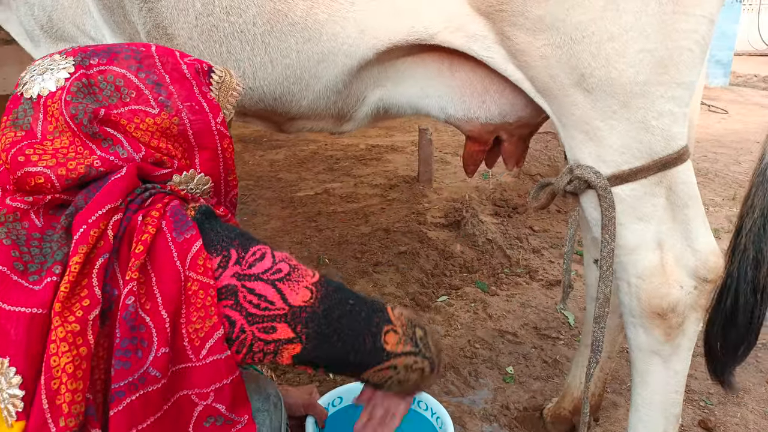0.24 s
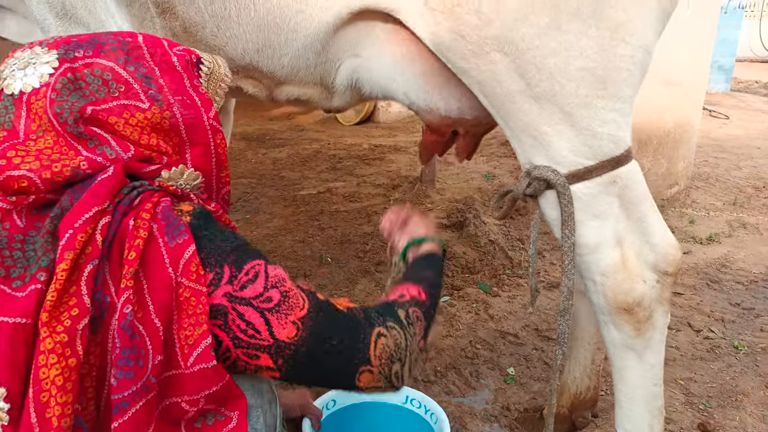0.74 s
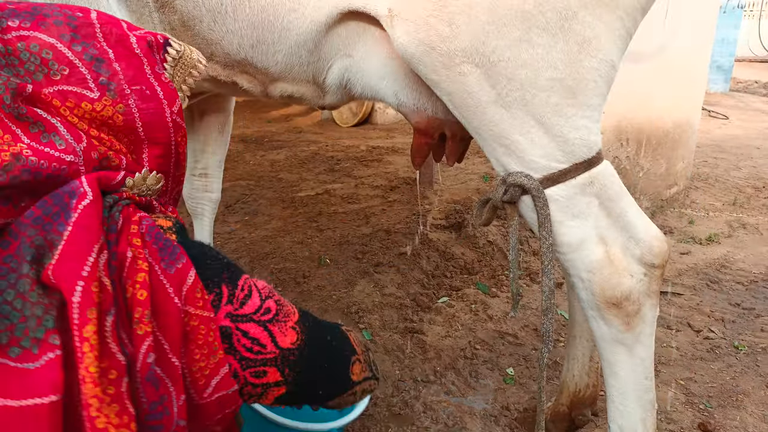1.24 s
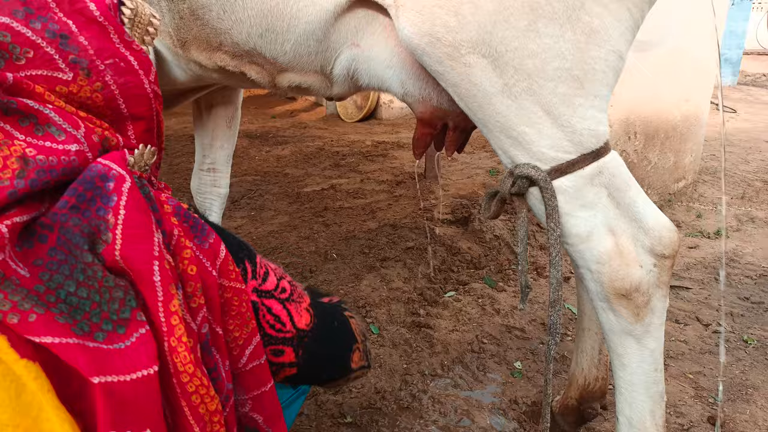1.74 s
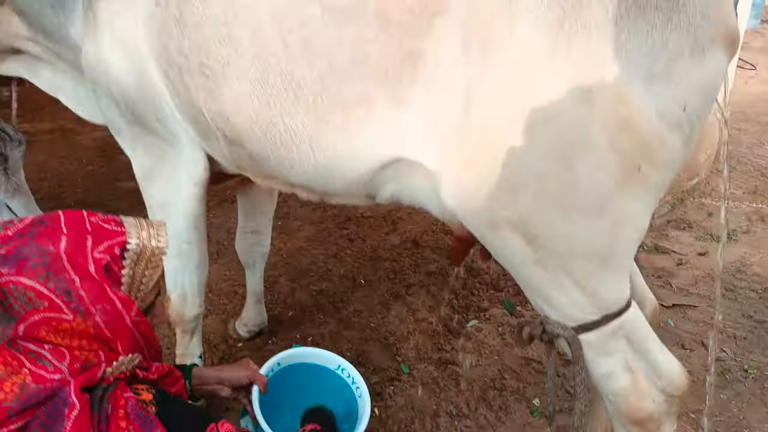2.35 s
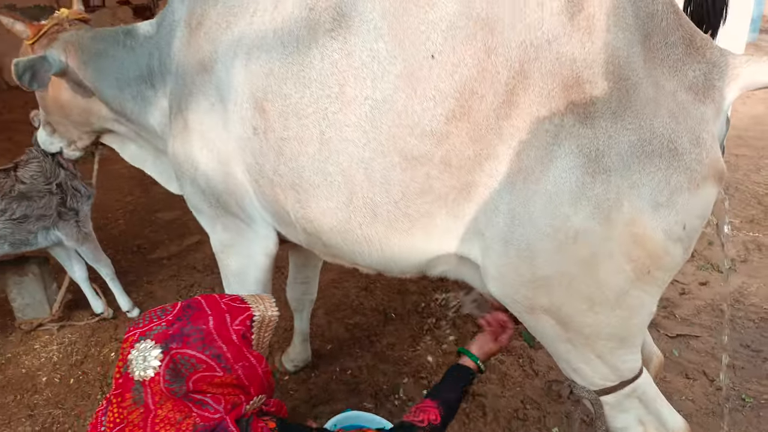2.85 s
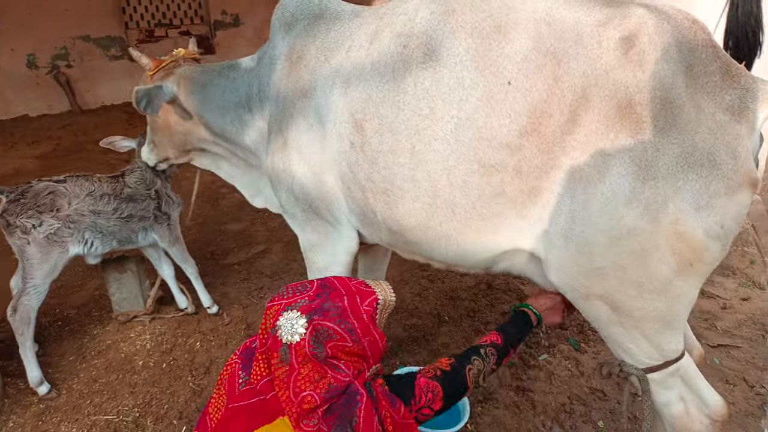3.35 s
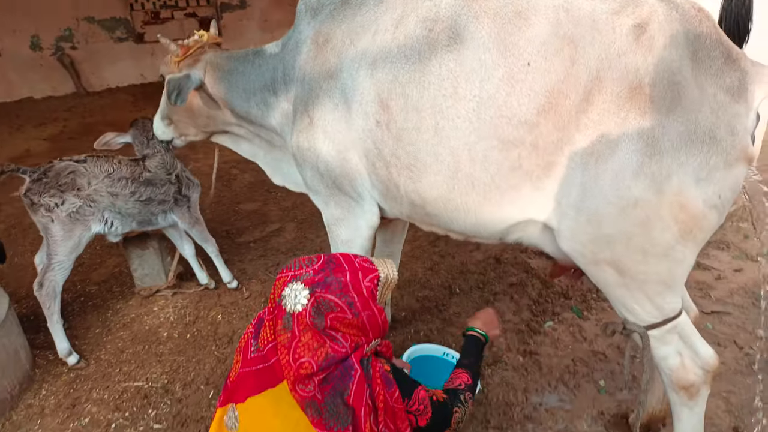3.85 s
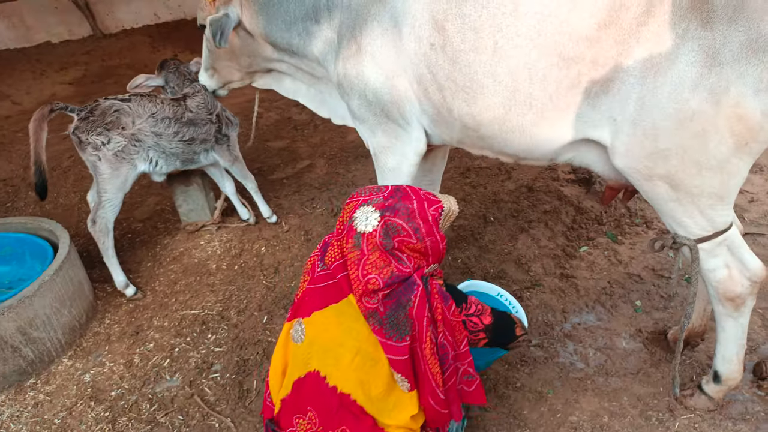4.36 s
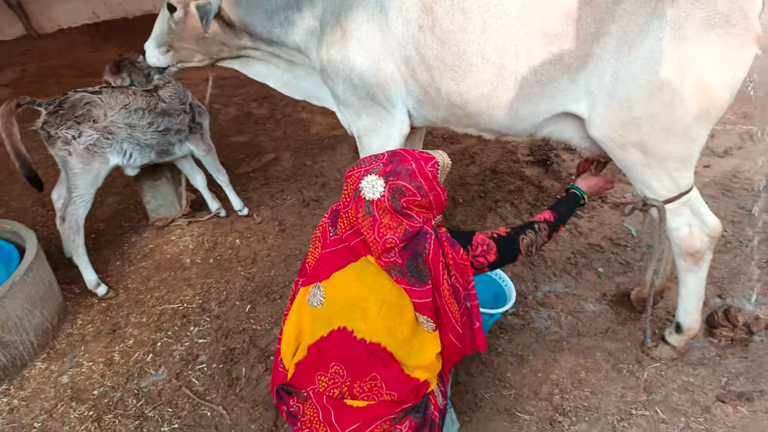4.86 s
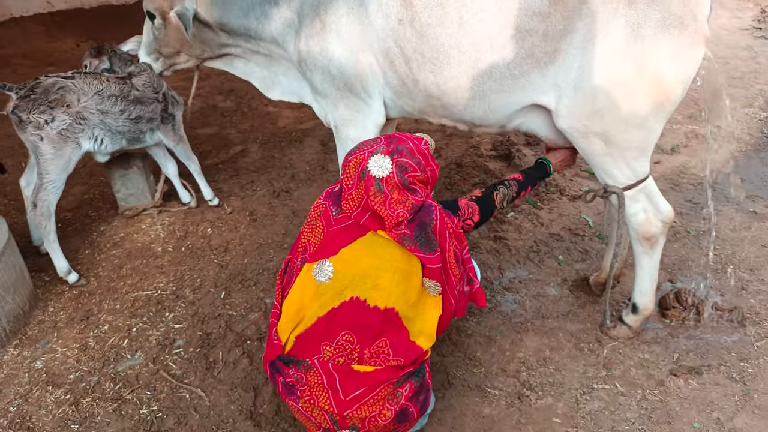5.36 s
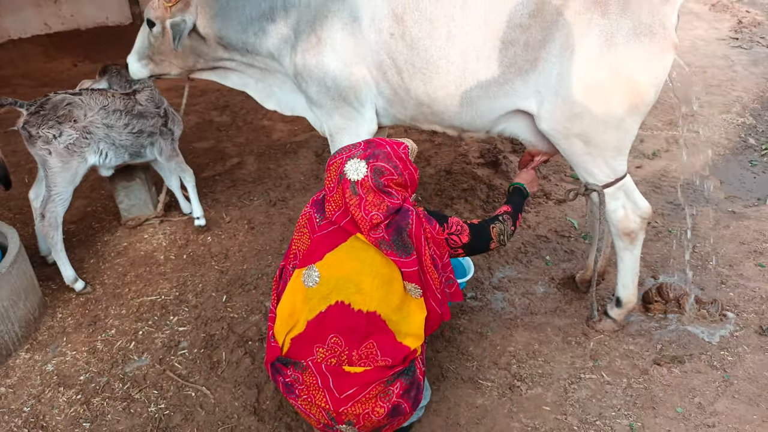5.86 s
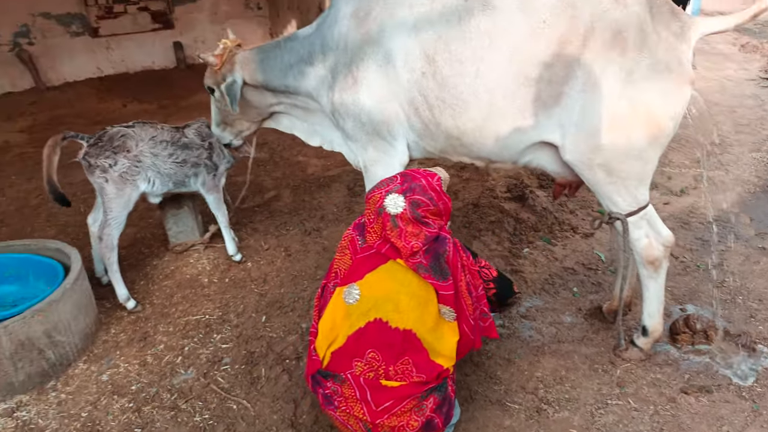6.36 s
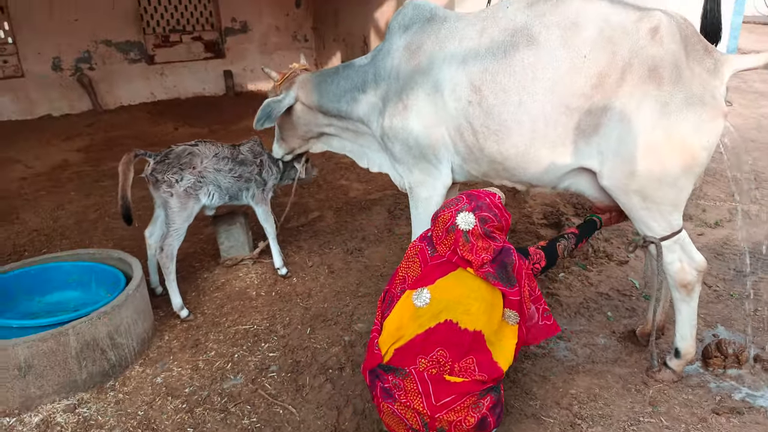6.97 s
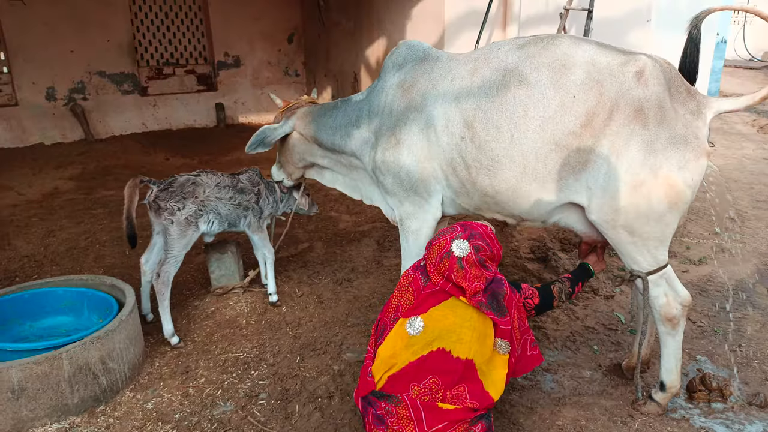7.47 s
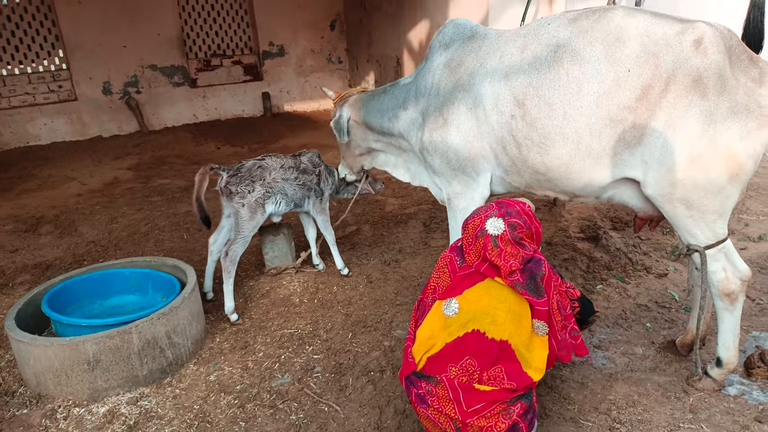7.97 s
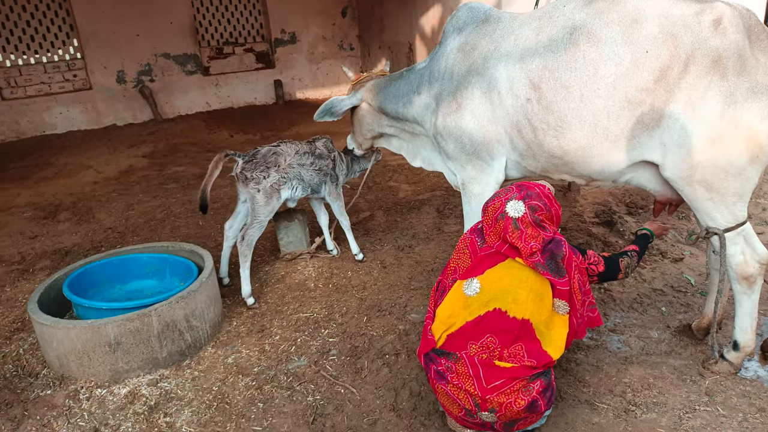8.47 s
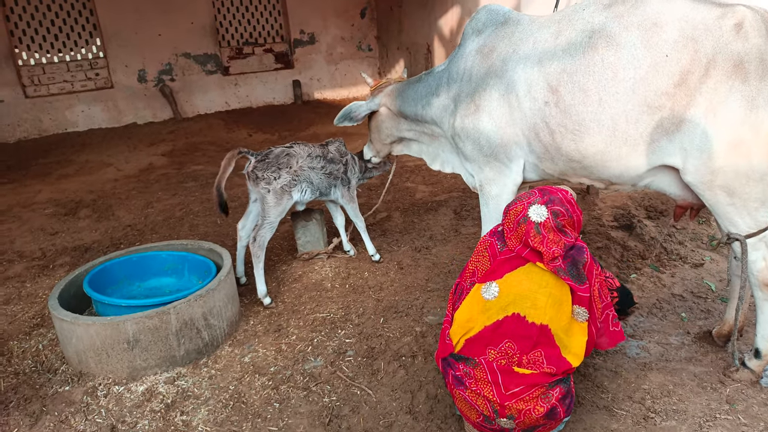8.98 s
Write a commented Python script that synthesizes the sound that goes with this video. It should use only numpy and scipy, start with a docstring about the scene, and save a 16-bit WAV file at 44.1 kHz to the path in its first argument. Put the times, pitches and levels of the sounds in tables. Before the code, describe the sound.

Beside a shed, a hand dips into a plastic bucket with bubbly plops and short sloshes, then throws water over a cow's udder. Splashes and thin trickles spatter on wet earth, growing steadier. The hand-held microphone starts close and backs away, picking up finger knocks, rubbing and soft low wind buffets. There is faint short echo from the walls.

```python
"""A farmyard by a shed: a cow's udder is washed before milking, water scooped by hand from a plastic bucket.
Splashes, drops and a thin stream spattering on wet earth are showers of noise puffs and tiny bubbles.
The water gives chirping sine bubbles, bubble clouds over a soft wash, and short gliding narrow-band rings.
Low noise buffets the hand-held microphone, mostly from wind; fingers bump its case as damped sines and
rub it as shaped noise. The shed walls answer the water with short noise tails, over a quiet bed of air."""
import sys
import numpy as np
from scipy import signal
from scipy.fft import rfft, irfft, next_fast_len
from scipy.io import wavfile
from scipy.ndimage import uniform_filter1d, map_coordinates

SR = 44100
rng = np.random.default_rng(int(sys.argv[2]) if len(sys.argv) > 2 else 0)


def file_out(sig):
    """Save sig as 16-bit WAV at sys.argv[1]."""
    # one column per channel
    cols = np.atleast_2d(sig).T
    # limit, then scale
    lim = np.clip(cols, -1, 1)
    pcm = np.round(lim * 32767).astype(np.int16)
    wavfile.write(sys.argv[1], SR, pcm)


N = 406602  # length in samples

# Still yard air. Each row: frequency in Hz, level in dB.
AIR_COLOUR = [(25, 2), (110, 4.5), (300, 0), (600, -8), (2000, -18.5), (15000, -41.5)]

# Low buffets on the microphone: mostly wind gusts, a few from handling. Each row: start in seconds,
# length in seconds, level in dB before the flutter, left over right in dB.
BUFFETS = [(2.109, 0.06, -41, 3), (2.18, 0.18, -49.5, 3), (2.414, 0.046, -47, -25), (2.556, 0.1, -52.5, 5),
           (3.204, 0.12, -48, 2), (3.365, 0.045, -61, -16), (3.709, 0.033, -52, 5),
           (3.762, 0.041, -47.5, -16), (4.483, 0.18, -55, -13), (4.747, 0.12, -36, 17),
           (4.863, .18, -42.5, 18), (5.366, 0.07, -50.5, -18), (5.534, 0.12, -57, -6),
           (6.536, 0.14, -46.5, -7), (7.394, 0.062, -47, 3), (8.334, 0.069, -63, 16),
           (8.558, 0.067, -55, 27), (9.1, 0.055, -66, -8)]
# Colour of the buffeting. Each row: frequency in Hz, level in dB.
BUFFET_COLOUR = [(20, -24.5), (40, -5.5), (65, 8.5), (110, 6.5), (160, -6), (210, -17.5), (300, -32.5),
                 (600, -43)]
BUFFET_RISE_S, BUFFET_T60_S = 0.047, 0.15
FLUTTER_DB, FLUTTERS_PER_S = 3.5, 17  # depth and pace of the flutter inside a buffet

# Fingers bumping the case. Each row: start in seconds, knock level in dB, pitch in Hz, creak level in dB.
BUMPS = [(3.099, -29.5, 440, -32), (3.163, -27.5, 447, -52), (3.196, -23.5, 444, -38),
         (3.232, -17.5, 410, -36), (3.246, -23, 300, -32), (3.26, -29, 265, -46), (4.078, -30.5, 297, -54),
         (4.107, -26, 330, -50), (4.115, -18.5, 273, -43), (4.148, -21, 272, -42), (4.175, -36, 284, -60),
         (6.545, -29.5, 308, -55), (6.623, -30, 306, -81), (7.4278, -18.5, 240, -27),
         (7.4333, -12, 308, -27), (7.4453, -23.5, 248, -25)]
# Colour of the case's creak. Each row: frequency in Hz, level in dB.
CREAK_COLOUR = [(500, -10.5), (800, -5.5), (1100, -4.5), (1420, 11.5), (1750, 0.5), (2100, -3),
                (3000, -14.5), (5000, -46)]
# Fingers sliding on the case. Each row: start in seconds, rise in seconds, length in seconds, level in dB.
SLIDES = [(3.079, 0.023, 0.07, -50), (3.131, 0.13, 0.14, -34), (3.276, 0.023, 0.03, -42),
          (6.547, 0.017, 0.072, -52.5), (7.423, 0.009, 0.015, -27)]
# Colour of the rubbing. Each row: frequency in Hz, level in dB.
RUB_COLOUR = [(40, -33), (90, -6), (300, -1.5), (470, -7), (620, -23.5), (1000, -52), (1420, -26),
              (1900, -53), (4000, -40)]
# The case singing under a sliding finger. Each row: pitch in Hz, width in Hz, level in dB against the rub.
CASE_TONES = [(469, 48, -11.5), (1436, 84, -15)]
SLIDE_T60_S = 0.089

# Murky ring left by the hardest bumps. Each row: start in seconds, level in dB, t60 in seconds, pitch in Hz,
# sag in octaves a second, low hum level in dB.
AFTERRINGS = [(4.109, -56.5, 0.9, 2107, .7, -55), (7.432, -39.5, 0.96, 2124, .35, -39)]
# Colour of the ring's rasping skirt. Each row: frequency in Hz, level in dB.
SKIRT_COLOUR = [(150, -31), (350, -23.5), (520, -28), (1000, -20), (1400, -10.5), (1750, 3), (2100, -4),
                (2400, -15), (3200, -14.5), (6000, -25.5)]
RING_WIDTH_HZ, SKIRT_DB = 140, -0.5  # the skirt is set against the ring
HUM_HZ, HUM_WIDTH_HZ, HUM_CLIMB_OCTAVES_PER_S, HUM_T60_S = 284, 53, 1, 0.39

# Short narrow-band rings: the bucket's hollow answering the hand, and bright tails of splashes.
# Each row: start in seconds, level in dB, pitch in Hz, t60 in seconds, width in Hz, glide in octaves a second.
WATER_RINGS = [(0.169, -59.5, 2870, 0.33, 990, 0.5), (0.477, -44.5, 534, 0.24, 45, -0.5),
               (0.477, -30, 820, 0.023, 190, 5), (.5, -47, 1172, 0.32, 100, -1),
               (.67, -61, 2170, .25, 70, 2), (0.83, -56, 1140, 0.39, 130, -3),
               (.84, -57, 1870, 0.47, 50.3, -0.3), (1.145, -66, 2310, 0.33, 500, 2.5),
               (1.51, -64.5, 997, 0.45, 90, 0.5), (1.609, -57, 2860, 0.33, 450, -1),
               (1.716, -51, 706, 0.56, 166, 1.5), (1.98, -58.5, 807, 0.27, 80, -3),
               (2.425, -56.5, 782, 0.25, 80, 0), (4.508, -52.5, 614, 0.47, 100, -1),
               (4.83, -48.5, 803, 0.099, 179, 0), (5.5, -48.5, 771, 0.56, 177, 0.5),
               (5.58, -49.5, 761, 0.32, 149, -.7), (6.35, -52, 691, 0.41, 140, 0.5),
               (6.352, -47, 1080, 0.37, 110, 0), (6.50, -55.5, 827, 0.49, 140, 1),
               (6.76, -61, 1020, 0.43, 70, 0.5), (8.095, -53.5, 564, 0.21, 130, 2.5),
               (8.10, -57, 431, 0.43, 60, 0.5), (8.914, -54.5, 825, 0.081, 149, -1),
               (8.93, -64.5, 508, 0.49, 60, 0.5)]

# Large air pockets closing in the water. Each row: start in seconds, level in dB, pitch in Hz,
# life in cycles (to -60 dB), pitch glide over that life as a share.
PLOPS = [(.399, -38, 2540, 110, -0.098), (.429, -31.5, 1610, 75, 0.31), (.478, -27, 1170, 45, -0.09),
         (0.478, -26, 1800, 60, -0.016), (.503, -34, 1170, 55, 0.025), (.526, -30, 2310, 87, 0),
         (0.582, -23, 1900, 48, 0.17), (.591, -30, 2370, 100, 0.028), (.626, -35, 1740, 150, 0.3),
         (0.646, -36.5, 1123, 70, 0.0074), (.659, -36, 1194, 58, 0.097), (.665, -43, 2200, 120, 0),
         (.772, -32.5, 1260, 45, 0.23), (.791, -43, 1350, 55, -.05), (0.813, -31.5, 1160, 42, -0.086),
         (.839, -34, 1180, 64, -0.067), (1.506, -48.5, 1000, 50, 0.034), (1.526, -45, 3090, 130, -0.017),
         (1.636, -41.5, 2930, 85, -0.061), (1.658, -32, 1670, 60, 0.13), (1.689, -36, 1120, 50, -0.19),
         (1.707, -24.5, 1850, 52, -0.095), (1.716, -32, 1530, 57, -0.21), (1.774, -40, 2650, 74, 0),
         (1.776, -30, 1640, 42, -0.026), (1.805, -34.5, 3290, 91, 0), (1.822, -36, 2550, 61, -0.038),
         (1.835, -31, 1670, 62, 0.082), (1.853, -32.5, 1860, 62, 0.043), (1.947, -32, 2550, 74, 0.33),
         (2.065, -38.5, 1315, 66, -0.17), (2.425, -32.5, 1530, 55, 0.1), (2.437, -27.5, 1570, 51, 0.26),
         (2.541, -35.5, 2490, 97, 0.056), (2.579, -38, 1226, 65, -.1), (2.679, -31.5, 1180, 30, 0),
         (2.754, -39, 950, 40, -.04), (2.786, -27, 1180, 45, 0.24), (2.791, -28.5, 1800, 55, -0.053),
         (2.841, -32.5, 1390, 48, 0.25), (4.509, -40, 620, 45, -0.087), (4.549, -32.5, 1406, 66, -0.12),
         (4.835, -34, 2110, 58, 0), (4.868, -41, 1236, 53, .1), (5.509, -38, 820, 36, 0),
         (6.307, -45, 1176, 130, 0), (6.336, -29.5, 751, 37, -0.0099), (6.695, -36, 1180, 45, -0.015),
         (6.714, -28, 2140, 58, -0.026), (8.075, -34, 1126, 74, -0.13)]
PLOP_CLOSE_S = 0.0021  # time for an air pocket to pinch off

# The hand stirring the bucket, or water running off it. Each row: start in seconds, length in seconds,
# level in dB, bubble pitch in Hz.
SLOSHES = [(0.385, 0.13, -55, 2080), (0.482, 0.13, -46, 1677), (0.748, 0.15, -68, 1380),
           (1.124, 0.019, -58.5, 1860), (1.487, 0.029, -62, 1036), (1.673, 0.054, -44.5, 1580),
           (1.774, 0.2, -50.5, 1647), (2.416, 0.014, -60, 1660), (2.467, 0.41, -55.5, 1593),
           (2.721, 0.088, -48, 1407), (3.07, 0.013, -49.5, 1485), (4.078, 0.081, -59, 1290),
           (4.193, 0.33, -64, 1960), (4.52, 0.044, -54, 1490), (4.746, 0.14, -54, 2055),
           (5.106, 0.054, -63, 1605), (5.477, 0.12, -52.5, 967), (5.616, 0.053, -55, 1660),
           (5.914, 0.0072, -51, 2020), (6.334, 0.032, -46, 1750), (6.482, 0.039, -50, 1990),
           (6.641, 0.28, -55.5, 1866), (7.42, 0.19, -50.5, 2170), (8.06, 0.028, -46, 1250),
           (8.133, 0.13, -54.5, 1684), (8.447, 0.12, -48.5, 2150), (8.893, 0.207, -53.5, 2000),
           (9.114, 0.038, -49.5, 1450)]
# Colour of the wash under the bubbles. Each row: frequency in Hz, level in dB.
WASH_COLOUR = [(600, -25), (900, 5), (1400, 6), (2600, 7), (3800, -19)]
SLOSH_RISE_S, SLOSH_T60_S = 0.02, 0.28
SLOSH_BUBBLES_PER_S, SLOSH_WASH_DB = 700, -4  # the wash is set against the bubbles

# The loudest single drops landing. Each row: start in seconds, spreading time in seconds,
# wet slap level in dB, slap pitch in Hz, dry crack level in dB.
DROPS = [(0.1628, 0.00075, -36, 2900, -43), (0.32, 0.0012, -55.5, 4290, -57),
         (0.3528, 0.0016, -71, 3830, -45.5), (0.3796, 0.0038, -58, 2600, -43.5),
         (0.4067, 0.0013, -55, 2700, -58), (0.4792, 0.00099, -35.5, 1280, -42),
         (0.536, 0.0011, -42, 1840, -51), (0.5824, 0.00075, -33, 1950, -62),
         (0.598, 0.0012, -51, 1960, -61), (0.7454, 0.0023, -50, 2700, -60),
         (0.7531, 0.0015, -36, 2470, -38.5), (0.769, 0.00085, -50, 2300, -44),
         (0.783, 0.00095, -59, 3530, -41), (0.8164, 0.0014, -46, 1370, -48),
         (0.8751, 0.00076, -49, 3220, -51), (1.015, 0.0017, -68, 3700, -53.5),
         (1.142, 0.0012, -55, 2000, -72), (1.2354, 0.00095, -55, 3700, -60),
         (1.276, 0.00092, -60, 3770, -49), (1.3507, 0.00051, -41.5, 3010, -48.5),
         (1.6933, 0.00063, -46, 2920, -76), (1.7211, 0.0016, -36, 1670, -51.5),
         (1.8058, 0.0021, -56, 2800, -47), (1.819, 0.0012, -41.5, 2320, -68),
         (1.981, 0.00047, -40.5, 1940, -64), (2.0492, 0.002, -46.5, 3450, -62),
         (2.1194, 0.00049, -60, 4250, -42.5), (2.132, 0.0005, -68, 4200, -52),
         (2.168, 0.0032, -49.5, 3340, -41), (2.1828, 0.00061, -66, 3680, -43),
         (2.209, 0.0012, -47.5, 3860, -58), (2.305, 0.0014, -49, 3780, -39.5),
         (2.4266, 0.0024, -42, 2680, -44), (2.449, 0.00091, -36, 2430, -51),
         (2.481, 0.00065, -52, 2390, -48), (2.5182, 0.0011, -41, 1420, -52),
         (2.54, 0.00052, -63, 2510, -40), (2.58, 0.0006, -64, 3020, -62), (2.61, 0.002, -39.5, 1600, -67),
         (2.644, 0.001, -63, 3000, -45), (2.671, 0.0012, -47, 1580, -60), (2.779, 0.0019, -46, 2730, -37.5),
         (2.855, 0.0006, -55, 2960, -45), (2.8993, 0.0012, -50, 3500, -41),
         (2.9349, 0.00096, -42, 3650, -61), (2.98, 0.001, -61, 2560, -42),
         (3.019, 0.0011, -44.5, 3750, -42.5), (3.046, 0.0005, -56, 3900, -38.5),
         (3.09, 0.0018, -41.5, 2920, -47), (3.094, 0.001, -31.5, 3420, -43),
         (3.131, 0.00077, -45, 3760, -39.5), (3.277, 0.0011, -39, 3400, -49),
         (3.329, 0.00092, -51, 3150, -42), (3.354, 0.0012, -41, 2820, -39.5),
         (3.3868, 0.0015, -39, 3910, -58), (3.431, 0.00099, -43, 3630, -46.5),
         (3.4424, 0.0013, -35.5, 3000, -38.5), (3.4825, 0.00061, -48, 3100, -41),
         (3.559, 0.00048, -48, 3640, -33.5), (3.5812, 0.0011, -55, 4100, -39),
         (3.6219, 0.0015, -43, 2460, -48), (3.747, 0.0007, -44.5, 4000, -69),
         (3.8692, 0.0013, -43.5, 2480, -61), (3.9745, 0.00094, -44.5, 3800, -49),
         (4.1083, 0.00049, -48, 3300, -47), (4.181, 0.00071, -65.5, 3260, -42.5),
         (4.33, 0.0021, -44.5, 3000, -60), (4.3742, 0.0011, -39, 2020, -53),
         (4.4371, 0.00045, -52, 2280, -38.5), (4.4593, 0.00039, -59, 3380, -41),
         (4.506, 0.00037, -51, 4270, -39.5), (4.644, 0.00038, -49, 3360, -41),
         (4.735, 0.0018, -43, 2150, -54), (4.842, 0.00097, -52, 3570, -41),
         (4.91, 0.00061, -49.5, 3700, -43), (5.0153, 0.00099, -47.5, 3500, -40),
         (5.0422, 0.00032, -47, 3840, -39), (5.0755, 0.0018, -44.5, 2160, -44.5),
         (5.135, 0.001, -41, 1610, -41.5), (5.173, 0.0007, -51, 3500, -56),
         (5.2406, 0.00029, -63, 3290, -75), (5.3562, 0.00074, -55, 3200, -41),
         (5.375, 0.00063, -49, 3900, -48), (5.394, 0.0005, -66, 3100, -35),
         (5.4547, 0.00062, -55, 2900, -38), (5.466, 0.00034, -50.5, 2420, -39),
         (5.539, 0.00076, -51.5, 3700, -41.5), (5.624, 0.0005, -64, 3200, -47.5),
         (5.6668, 0.00037, -45.5, 2650, -43), (5.7574, 0.00072, -59, 3240, -44),
         (5.9099, 0.0014, -72, 3420, -42.5), (5.921, 0.00079, -47.5, 3800, -54.5),
         (5.9349, 0.00085, -45.5, 3500, -35.5), (5.967, 0.00055, -58, 3330, -42),
         (6.086, 0.00075, -45, 3940, -52), (6.312, 0.0005, -56, 3200, -44),
         (6.427, 0.00065, -45.5, 3660, -44), (6.487, 0.00067, -46, 1880, -52),
         (6.579, 0.00044, -51, 3400, -49.5), (6.591, 0.0005, -64, 3900, -50),
         (6.6603, 0.0004, -41.5, 2300, -49), (6.8272, 0.00068, -38, 1810, -38.5),
         (6.89, 0.0019, -37.5, 2920, -48), (6.9186, 0.00047, -41, 3480, -65),
         (6.9579, 0.00029, -43.5, 2930, -61), (7.0488, 0.0006, -52, 3490, -44),
         (7.2277, 0.0004, -45, 3000, -55), (7.2524, 0.0023, -47, 2280, -47.5),
         (7.27, 0.0007, -49, 3930, -56), (7.596, 0.00041, -39.5, 3160, -60),
         (7.684, 0.00021, -55, 3450, -43), (7.78, 0.00054, -48, 2590, -45), (7.973, 0.0005, -48, 3700, -42),
         (7.9916, 0.0019, -38.5, 2250, -38.5), (8.152, 0.0005, -45, 3780, -41),
         (8.161, 0.00065, -43, 3210, -68), (8.241, 0.00028, -42, 3100, -37),
         (8.253, 0.00046, -35, 2300, -41), (8.4978, 0.00075, -41.5, 2550, -46),
         (8.5799, 0.0009, -43, 2670, -51.5), (8.5967, 0.0007, -42.5, 3370, -57),
         (8.6134, 0.0005, -44, 2570, -46), (8.7374, 0.0024, -41.5, 3020, -48),
         (8.788, 0.0014, -41, 2050, -46), (9.0346, 0.00076, -45.5, 3240, -38),
         (9.0624, 0.00097, -46, 2930, -43), (9.1739, 0.00053, -37.5, 3370, -60),
         (9.1866, 0.0013, -36.5, 4000, -70)]
DROP_LEVEL_S = .004  # a drop's slap and crack take their levels as rms over this time

# The thin stream on the ground, setting in and growing steady. Each row: time in seconds, spray level in dB,
# wet body level in dB, mist in dB over the spray.
STREAM = [(0, -70, -78.5, 24), (.3, -80, -76.5, 0.5), (.6, -57.5, -97, 0), (1.05, -70, -82, 10),
          (1.3, -62, -66.5, 3), (1.65, -72, -67.5, 0), (1.9, -51.5, -55.5, 3), (2.12, -65.5, -80, -3),
          (2.45, -52, -71.5, 3.5), (3.3, -50.5, -52.5, 6), (3.7, -50.5, -66, 0), (4.4, -50, -59, -10),
          (5.25, -51, -59.5, 5.5), (5.85, -46.5, -59, 5.5), (6.6, -50, -51.5, -4), (7.2, -51, -52, -7.5),
          (8.35, -55.5, -50, -5), (9.22, -55.5, -50, 3.5)]
# Handfuls of water splashing on the udder, the ground or back into the bucket. Each row: start in seconds,
# length in seconds, spray level in dB, wet body level in dB.
SPLASHES = [(0.146, 0.012, -63, -58), (0.373, 0.043, -48.5, -66), (0.456, 0.22, -80, -53),
            (0.738, 0.063, -54, -49.5), (0.814, 0.1, -58.5, -57.5), (1.143, .02, -57.5, -74.5),
            (1.196, 0.043, -55.5, -71), (1.339, 0.089, -53, -64.5), (1.497, 0.025, -60, -61.5),
            (1.613, 0.085, -83, -78), (1.682, 0.094, -52, -56), (1.896, 0.17, -47.5, -52.5),
            (2.044, .012, -55, -53), (2.152, 0.1, -49, -61.5), (2.279, 0.1, -49, -65.5),
            (2.388, 0.083, -45.5, -53), (2.574, 0.0081, -35.5, -70), (2.5, 0.031, -60, -65),
            (2.642, 0.046, -47.5, -57), (2.72, 0.14, -48, -53.5), (2.884, 0.079, -74.5, -53.5),
            (3.054, 0.12, -53, -56), (3.262, 0.11, -51, -56), (3.426, 0.025, -62, -82),
            (3.882, 0.16, -52, -57.5), (4.077, 0.021, -67, -67), (4.799, 0.12, -50, -66),
            (5.031, 0.16, -49, -57.5), (5.344, 0.12, -48, -60), (5.499, 0.24, -50, -57.5),
            (5.928, 0.21, -48.5, -59.5), (6.652, 0.3, -58, -55.5), (7.231, 0.18, -70, -60.5),
            (7.457, 0.19, -54, -64), (7.981, 0.13, -55.5, -52), (8.19, 0.059, -70, -54),
            (8.466, 0.19, -74, -54.5), (9.13, 0.073, -76, -70)]
# The spray blurring into hiss as the microphone backs away. Each row: time in seconds, hiss in dB over splats.
BLUR = [(0, -10.5), (5.4, -10), (6.8, -4.5), (9.22, -5.5)]
# Colours of the spray, the mist, the stream's wet body and the splashes' wet body.
# Each row: frequency in Hz, level in dB.
SPRAY_COLOUR = [(1500, -42), (3000, -9.5), (4800, -7.5), (5800, 0), (8300, 0), (11000, -16.5),
                (16000, -6.5)]
MIST_COLOUR = [(6500, -36), (9000, 1), (11000, -0.5), (16000, -1.5)]
BODY_COLOUR = [(700, -32), (1200, -9), (1700, 1), (2300, 4), (3000, -2), (3700, 0), (4800, -6.5),
               (8000, -6.5)]
SPLASH_COLOUR = [(600, -18), (900, -21), (1400, -9.5), (2000, -1), (2700, 3.5), (3500, 3), (4800, 6),
                 (8000, -15.5)]
SURGE_DB, SURGES_PER_S = 1.26, 20  # the flow is never quite even
SPLASH_RISE_S, SPLASH_T60_S = 0.0081, 0.1
PIPS_DB, FIZZ_DB = -9, -4.5  # tiny bubbles and hiss in the wet body, against its splats
MIST_FLICKER_DB, MIST_FLICKERS_PER_S = -2, 33  # the mist comes in puffs

# Decay of the shed walls' answer. Each row: frequency in Hz, t60 in seconds.
YARD_DECAY = [(300, 0.11), (2500, 0.14), (12000, 0.077)]
ECHO_DB, ECHO_RENEW_S = -7.5, .2  # a new noise tail this often, for a smooth echo colour

# Colour of the two microphone ports. Each row: frequency in Hz, level in dB.
LEFT_PORT = [(1500, -4.5), (2300, 1.5), (3800, 2), (5000, -5), (6500, 0), (7500, -2), (8800, -8),
             (9500, 0.5), (11300, 0.5), (12500, -0.5), (14000, -1), (15200, 3.5), (15650, 7)]
RIGHT_PORT = [(1500, -3), (2300, -2), (3800, 4.5), (4600, -2.5), (5400, -.5), (7400, 4.5), (9000, -14.5),
              (10300, -26), (11300, -5), (12200, -14), (13300, -10), (14600, -4.5), (15600, -2.5)]
# A dip in the left port's treble wanders as the microphone moves. Each row: time in seconds, centre in Hz,
# depth in dB.
DIP = [(0, 12200, 4), (3.3, 13100, 2.5), (4.2, 11100, 0.5), (5.3, 11600, 10), (6.3, 11500, 7.5),
       (7, 12400, 3.5), (9.2, 11200, 6)]
DIP_WIDTH_HZ = 1360
TOP_HZ = 15800  # the microphone's band limit


def amp(db):
    """Decibels to a linear gain."""
    return 10 ** (np.asarray(db) / 20)


def unit(x):
    """x brought to rms 1."""
    return x / np.sqrt(np.mean(x ** 2) + 1e-20)


def along(points, hz):
    """Values between (Hz, value) points, read on a log frequency axis."""
    f, v = np.transpose(points)
    return np.interp(np.log(hz + 1), np.log(f + 1), v)


def curves(rows):
    """One value per sample for each column after the time."""
    s, *cols = np.transpose(rows)
    return [np.interp(np.arange(N) / SR, s, c) for c in cols]


def filtered(x, response):
    """x times a response of frequency."""
    m = next_fast_len(N + SR // 2)
    gain = response(np.fft.rfftfreq(m, 1 / SR))
    return irfft(rfft(x, m) * gain, m)[..., :N]


def coloured(x, points):
    """x filtered by the given colour, at rms 1."""
    return unit(filtered(x, lambda hz: amp(along(points, hz))))


def band(x, lo_hz, hi_hz):
    """A steep causal band-pass."""
    edges = [lo_hz, min(hi_hz, SR / 2 - 1)]
    return signal.sosfilt(signal.butter(4, edges, "bandpass", fs=SR, output="sos"), x)


def steady(x, span):
    """x brought to an even flow near rms 1, levelled over span seconds."""
    power = np.mean(x ** 2, axis=0)
    for _ in range(2):
        power = np.abs(uniform_filter1d(power, int(span * SR) + 1))
    return x / np.sqrt(power + 1e-4 * power.mean())


def wobble(rate):
    """A smooth random curve, rate knots a second."""
    knots = rng.standard_normal(int(N * rate / SR) + 4)
    return map_coordinates(knots, [np.arange(N) * rate / SR])


def swell(start, length, rise, t60):
    """A gesture builds up, holds until its length is over, then dies away."""
    level = np.zeros(N)
    at = np.arange(max(int(start * SR), 0), min(int((start + length + 2 * t60) * SR), N))
    age = at / SR - start
    level[at] = np.clip(age / rise, 0, 1) ** 2 * amp(-60 * np.maximum(age - length, 0) / t60)
    return level


def murmur(hz, width_hz):
    """A narrow band of noise at rms 1 that follows a pitch given per sample."""
    lead = SR // 10  # lets the filter settle before the sound is used
    noise = rng.standard_normal((2, len(hz) + lead))
    lowpass = signal.butter(2, np.clip(width_hz / 2, 2, SR / 4), fs=SR, output="sos")
    a, b = signal.sosfilt(lowpass, noise)[:, lead:]
    phase = 2 * np.pi * np.cumsum(hz) / SR
    return unit(a * np.cos(phase) + b * np.sin(phase))


def place(times, waves, lag_s, scatter_s):
    """Sum short waves into stereo, each with its own lag; a positive lag reaches the left port first."""
    lag = lag_s + scatter_s * rng.standard_normal(len(times))
    pair = []
    port_waves = np.broadcast_to(waves, (2, *waves.shape[-2:]))
    for start, wave in zip((times - lag / 2, times + lag / 2), port_waves):
        first = np.round(np.abs(start) * SR).astype(int)
        index = first[:, None] + np.arange(wave.shape[1])
        pair.append(np.bincount(index.ravel(), wave.ravel(), N)[:N])
    return np.array(pair)


def drifting(x, depth_db):
    """x with slowly wandering patches of colour, different at each port."""
    z = signal.stft(x, nperseg=256)[2]
    patch = np.outer(np.hanning(14), np.hanning(400))  # frequency bins by time frames
    field = signal.fftconvolve(rng.standard_normal(z.shape), patch[None], "same")
    return signal.istft(z * amp(depth_db * unit(field)), nperseg=256)[1][:, :N]


def bubbles(hz, cycles, rise, t):
    """Damped sines that fall 60 dB in some cycles; a positive rise lifts the pitch, as near the surface."""
    turns = hz[:, None] * t
    age = np.minimum(turns / cycles, 2)
    tone = np.sin(2 * np.pi * turns * (1 + rise * age / 2))
    onset = 1 - np.exp(-turns ** 2 / 2)
    return tone * np.exp(-np.log(1000) * age) * onset


def froth(rate, hz, octaves, cycles, spread_db):
    """A dense cloud of short-lived bubbles scattered around one pitch."""
    count, t = int(rate * N / SR), np.arange(SR // 70) / SR
    pitch, size = rng.standard_normal(count), rng.standard_normal((count, 1))
    when = rng.uniform(0, N / SR, count)
    waves = bubbles(np.minimum(hz * 2 ** (octaves * pitch), TOP_HZ), cycles, rise=0.23, t=t)
    waves = waves * amp(spread_db * np.clip(size, -2, 2))
    return unit(place(when, waves, lag_s=.00008, scatter_s=.0001))


def splats(rate, t60, spread_db, apart):
    """A shower of tiny tinted noise puffs, films that spread and break; most are weak, a few strong."""
    count, t = int(rate * N / SR), np.arange(SR // 210) / SR
    size = amp(spread_db * np.minimum(rng.exponential(size=(count, 1)), 3.8))
    shared = rng.standard_normal((count, len(t)))
    puffs = shared + apart * rng.standard_normal((2, count, len(t)))  # partly different at each port
    tint = rng.uniform(-.8, .8, (count, 1))
    puffs = puffs + tint * np.roll(puffs, 3, axis=-1)
    shape = t / t60 * amp(-60 * t / t60)
    when = rng.uniform(0, N / SR, count)
    return unit(place(when, size * puffs * shape, lag_s=.00022, scatter_s=.000012))


def still_air():
    """The quiet yard: a soft bed of noise, partly shared by the ports."""
    return amp(-75.0) * coloured(rng.standard_normal(N) + 0.49 * rng.standard_normal((2, N)), AIR_COLOUR)


def buffeting():
    """Wind, and now and then handling, swells low noise with its own left-right balance; the ports mostly differ."""
    force = np.zeros((2, N))
    for s, length, db, side_db in BUFFETS:
        balance = unit(amp([[side_db / 2], [-side_db / 2]]))
        force += amp(db) * balance * swell(s, length, BUFFET_RISE_S, BUFFET_T60_S)
    rumble = coloured(rng.standard_normal((2, N)) + 0.28 * rng.standard_normal(N), BUFFET_COLOUR)
    rumble = np.array([steady(port[None], span=0.057)[0] for port in rumble])
    flutter = amp(FLUTTER_DB * wobble(FLUTTERS_PER_S))
    return force * flutter * rumble


def handling():
    """Bumps and rubbing travel through the case and reach both ports alike."""
    s, db, hz, creak_db = np.transpose(BUMPS)
    t = np.arange(SR // 10) / SR
    # hard bumps shift the whole case: a low push that grows faster than the knock
    push = amp(db - db.max())[:, None] * bubbles(np.full(len(s), 125.0), cycles=4.85, rise=0, t=t)
    knock = bubbles(hz, cycles=12.2, rise=0.23, t=t)
    knocks = place(s, amp(db)[:, None] * (knock + 1.1 * push), lag_s=0, scatter_s=0)
    slip = amp(creak_db[:, None] - 60 * t / 0.045) * rng.standard_normal((len(s), len(t)))
    slips = place(s, slip, lag_s=0, scatter_s=0)
    case = knocks + filtered(slips, lambda f: amp(along(CREAK_COLOUR, f)))
    force = sum(amp(db) * swell(s, length, rise, SLIDE_T60_S) for s, rise, length, db in SLIDES)
    song = sum(amp(db) * steady(murmur(np.full(N, hz), width_hz)[None], span=.015)
               for hz, width_hz, db in CASE_TONES)
    rub = steady(coloured(rng.standard_normal((1, N)), RUB_COLOUR), span=0.011)
    return case + force * (song + rub)


def afterring():
    """After a hard bump a thin rasping ring sags slowly, while a low hum climbs and dies sooner."""
    t, out = np.arange(SR) / SR, np.zeros((2, N))
    skirt = coloured(rng.standard_normal(N) + 0.37 * rng.standard_normal((2, N)), SKIRT_COLOUR)
    for s, db, t60, hz, sag, hum_db in AFTERRINGS:
        at = slice(int(s * SR), int(s * SR) + len(t))
        ring = steady(murmur(hz * 2 ** (-sag * t), RING_WIDTH_HZ)[None], span=0.018)
        ring = ring + amp(SKIRT_DB) * skirt[:, at]
        hum_pitch = HUM_HZ * 2 ** (HUM_CLIMB_OCTAVES_PER_S * t)
        hum = steady(murmur(hum_pitch, HUM_WIDTH_HZ)[None], span=.03)
        out[:, at] += ring * amp(db - 60 * t / t60) + hum * amp(hum_db - 60 * t / HUM_T60_S)
    return out


def water_rings():
    """The bucket's hollow, or a splash's bright tail, rings briefly in a narrow band whose pitch may slide."""
    t = np.arange(SR // 3) / SR
    rings = []
    for _, db, hz, t60, width_hz, glide in WATER_RINGS:
        ring = steady(murmur(hz * 2 ** (glide * t), width_hz)[None], span=0.016)[0]
        rings.append(ring * amp(db - 60 * t / t60))
    onset = 1 - np.exp(-t / 0.0028)
    return place(np.transpose(WATER_RINGS)[0], np.array(rings) * onset, lag_s=.00005, scatter_s=.00005)


def plops():
    """Large bubbles ring as the hand dips and lifts; they chirp up as they surface or sag as they sink."""
    s, db, hz, cycles, glide = np.transpose(PLOPS)
    t = np.arange(SR // 8) / SR
    wave = bubbles(hz, cycles[:, None], glide[:, None], t) * (1 - np.exp(-t / PLOP_CLOSE_S))
    return place(s, amp(db)[:, None] * wave, lag_s=.00008, scatter_s=.00006)


def slosh():
    """The scooping hand folds air into the water: a cloud of bubbles over a soft wash."""
    power, weighted_hz = np.zeros(N), np.zeros(N)
    for s, length, db, bubble_hz in SLOSHES:
        stir = (amp(db) * swell(s, length, SLOSH_RISE_S, SLOSH_T60_S)) ** 2
        power = power + stir
        weighted_hz = weighted_hz + stir * bubble_hz
    pitch_hz = weighted_hz / (power + 1e-30)  # where stirs overlap, the strongest weighs most
    # each bubble draws its own size, pitch and chirp
    count, t = int(SLOSH_BUBBLES_PER_S * N / SR), np.arange(SR // 25) / SR
    at = rng.integers(0, N, count)
    hz = pitch_hz[at] * np.exp(rng.uniform(-.42, .5, count))
    chirp = rng.uniform(-.08, .25, (count, 1))  # most bubbles rise in pitch
    size = amp(5.5 * np.clip(rng.standard_normal((count, 1)), -2, 2))
    waves = size * bubbles(hz, cycles=58, rise=chirp, t=t)
    cloud = place(at / SR, waves, lag_s=.00002, scatter_s=.00014)
    wash = coloured(splats(rate=1200, t60=0.0044, spread_db=8.5, apart=1.0), WASH_COLOUR)
    return np.sqrt(power) * steady(unit(cloud) + amp(SLOSH_WASH_DB) * wash, span=0.12)


def even(waves):
    """Each short wave scaled to the same energy: rms 1 over the drop level time."""
    return waves * np.sqrt(DROP_LEVEL_S * SR / np.sum(waves ** 2, axis=1, keepdims=True))


def drops():
    """Each drop spreads for a moment: a wet slap with a short ring, and a dry crack of spray."""
    s, spread_s, slap_db, hz, crack_db = np.transpose(DROPS)
    t = np.arange(SR // 25) / SR
    age = t / np.maximum(spread_s, .0002)[:, None]
    film = age * np.exp(-age)
    burst = film * rng.standard_normal(film.shape)
    smack = np.array([band(b, f / 1.38, f * 1.505) for b, f in zip(burst, hz)])
    ring = film * np.sin(2 * np.pi * hz[:, None] * t)
    slap = even(even(smack) + 0.91 * even(ring))
    crack = even(band(burst, 4600, 16000))
    waves = amp(slap_db)[:, None] * slap + amp(crack_db)[:, None] * crack
    return place(s, waves, lag_s=.00003, scatter_s=.00004)


def stream():
    """Liquid breaks on wet earth: mist and spray over heavy splats and bubbles; splashes add spray and froth."""
    spray_db, body_db, mist_db = curves(STREAM)
    surge_db = SURGE_DB * wobble(SURGES_PER_S)
    spray_power, splash_power = amp(spray_db + surge_db) ** 2, np.zeros(N)
    for s, length, splash_spray_db, splash_body_db in SPLASHES:
        flow = swell(s, length, SPLASH_RISE_S, SPLASH_T60_S) ** 2
        spray_power = spray_power + flow * amp(splash_spray_db) ** 2
        splash_power = splash_power + flow * amp(splash_body_db) ** 2

    heavy = splats(rate=480, t60=.004, spread_db=5.4, apart=.45)
    fine = splats(rate=480, t60=.0035, spread_db=6, apart=.35)
    fizz = splats(rate=2500, t60=.005, spread_db=1.5, apart=.3)  # countless rebounds merge into a hiss
    pips = froth(rate=600, hz=3700, octaves=.6, cycles=26, spread_db=4)
    foam = froth(rate=1000, hz=2300, octaves=.65, cycles=28, spread_db=5)

    blur = amp(curves(BLUR)[0])
    mist = coloured((fine + .7 * heavy + blur * fizz) / np.hypot(1.2, blur), MIST_COLOUR)
    mist_db = mist_db + MIST_FLICKER_DB * wobble(MIST_FLICKERS_PER_S)
    spray = coloured((heavy + blur * fizz + .35 * pips) / np.hypot(1, blur), SPRAY_COLOUR)
    spray = steady(drifting(spray + amp(mist_db) * mist, depth_db=1.6), span=.09)
    body = coloured(heavy + amp(FIZZ_DB) * fizz + amp(PIPS_DB) * pips, BODY_COLOUR)
    body = steady(body, span=.09)
    splash = steady(coloured(foam + .55 * heavy + .3 * fizz, SPLASH_COLOUR), span=.05)
    return np.sqrt(spray_power) * spray + amp(body_db + surge_db) * body + np.sqrt(splash_power) * splash


def yard(x):
    """The shed walls answer faintly with a noise tail; each frequency dies at its own speed."""
    hop = int(ECHO_RENEW_S * SR)
    padded = np.pad(x, ((0, 0), (hop, 2 * hop)))
    out = np.zeros((2, N + 2 * SR))
    window = np.sqrt(np.hanning(2 * hop))  # neighbouring pieces crossfade at equal power
    for start in range(0, N + hop, hop):
        # the tail is drawn anew for each piece, which keeps the echo colour smooth
        hz, t, z = signal.stft(rng.standard_normal((2, SR // 4)), SR, nperseg=256)
        decay = amp(-60 * t / along(YARD_DECAY, hz)[:, None])
        tail = signal.istft(z * decay, SR, nperseg=256)[1]
        piece = padded[:, start:start + 2 * hop] * window
        answer = signal.fftconvolve(piece, tail / np.linalg.norm(tail[0]), axes=1)
        out[:, start:start + answer.shape[1]] += answer
    return out[:, hop:hop + N]


def scene():
    """The water and its echo, with the handled case, the buffeting and the still air."""
    water = stream() + slosh() + water_rings() + drops() + plops()
    echo = amp(ECHO_DB) * yard(water)
    return water + echo + handling() + afterring() + buffeting() + still_air()


def dipped(x):
    """x with a soft notch that wanders in the treble."""
    hz, s, z = signal.stft(x, SR, nperseg=256)
    at, centre_hz, depth_db = np.transpose(DIP)
    notch = np.exp(-((hz[:, None] - np.interp(s, at, centre_hz)) / DIP_WIDTH_HZ) ** 2)
    return signal.istft(z * amp(-np.interp(s, at, depth_db) * notch), SR, nperseg=256)[1][:N]


def record(dry):
    """Each port has its own treble resonances; nothing is kept above the band limit."""
    ports = np.array([dipped(dry[0]), dry[1]])
    return filtered(ports, lambda hz: amp([along(LEFT_PORT, hz), along(RIGHT_PORT, hz)]) * (hz < TOP_HZ))


dry = scene()
out = record(dry)
file_out(out)
```